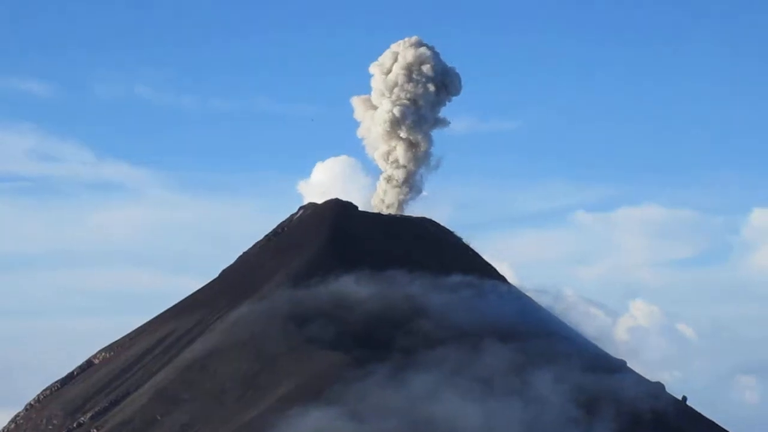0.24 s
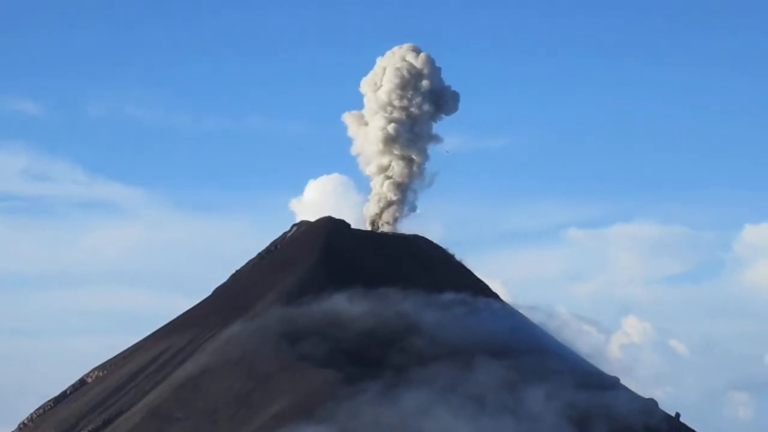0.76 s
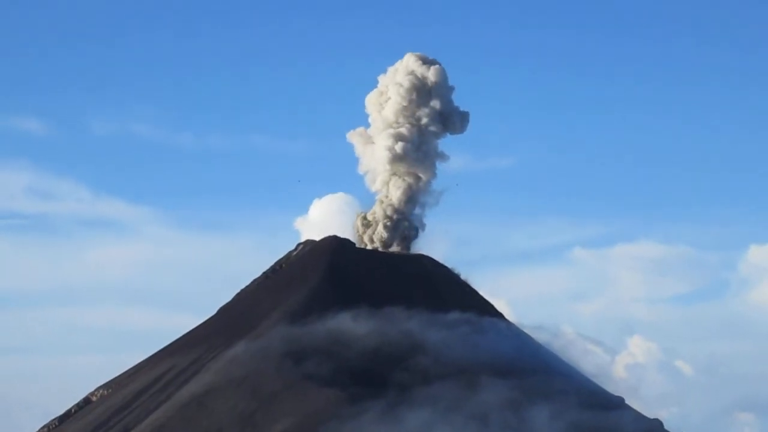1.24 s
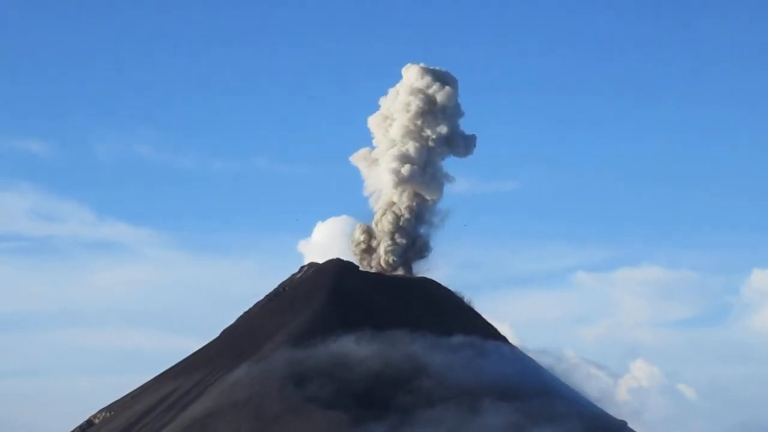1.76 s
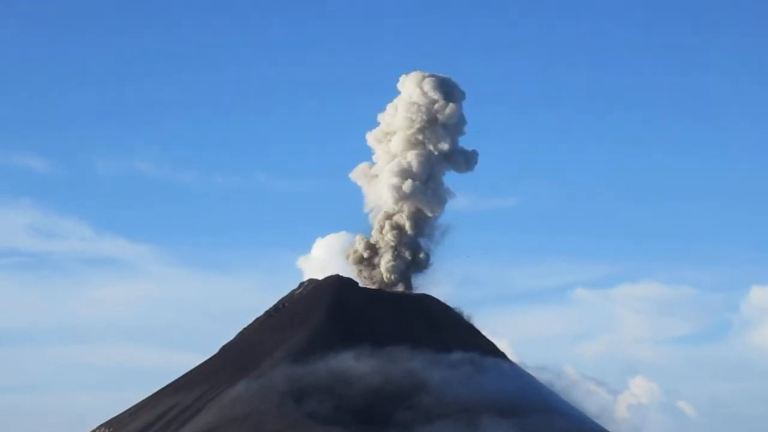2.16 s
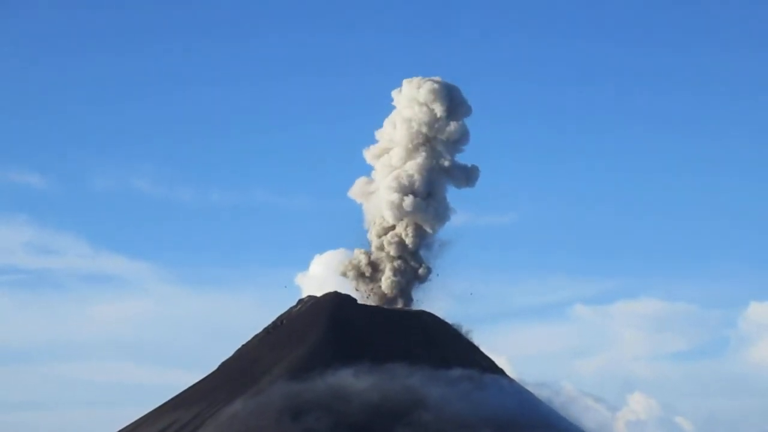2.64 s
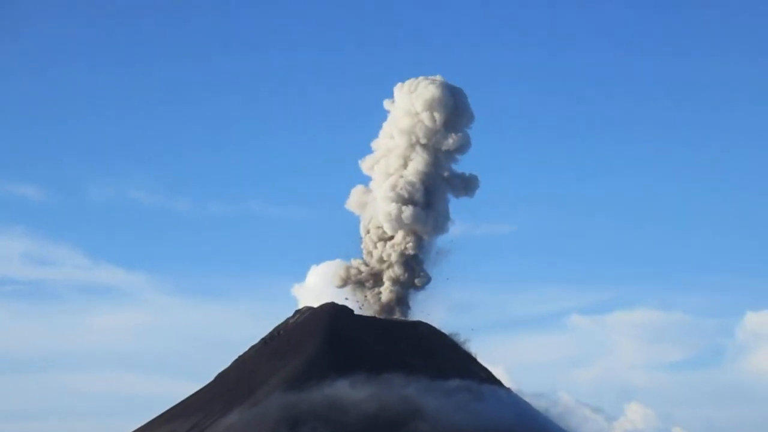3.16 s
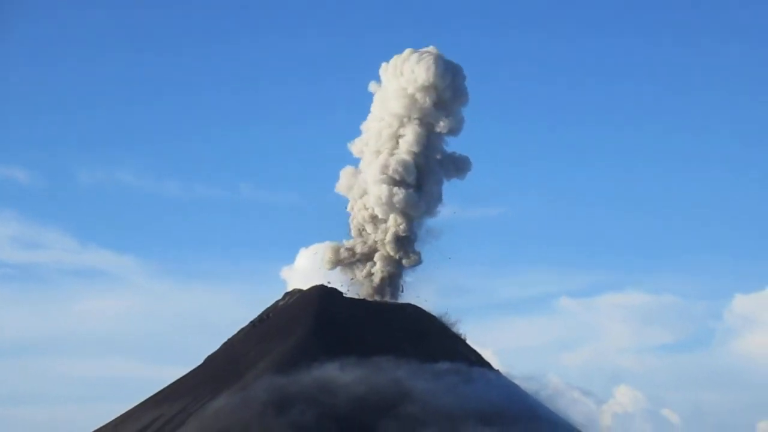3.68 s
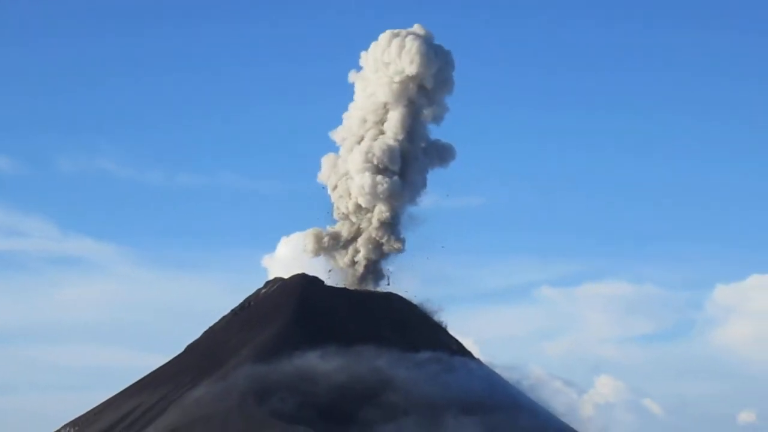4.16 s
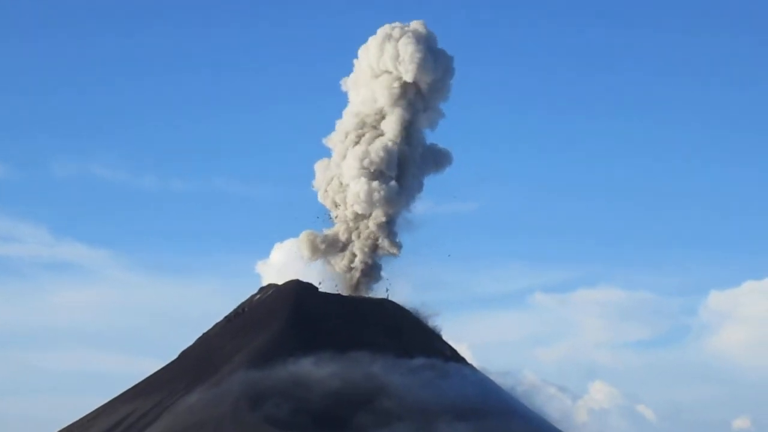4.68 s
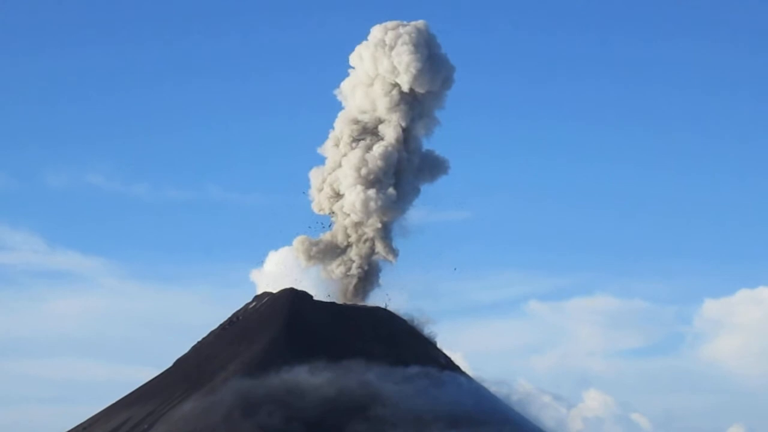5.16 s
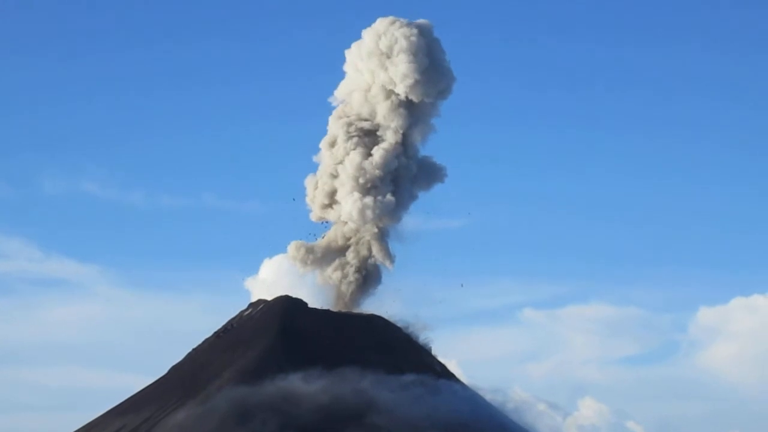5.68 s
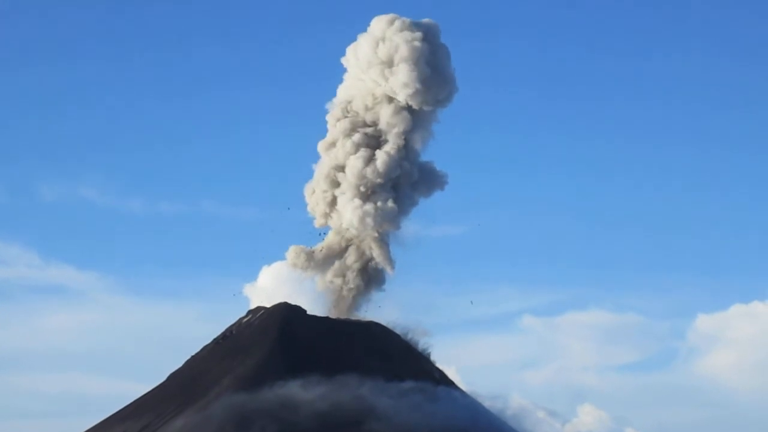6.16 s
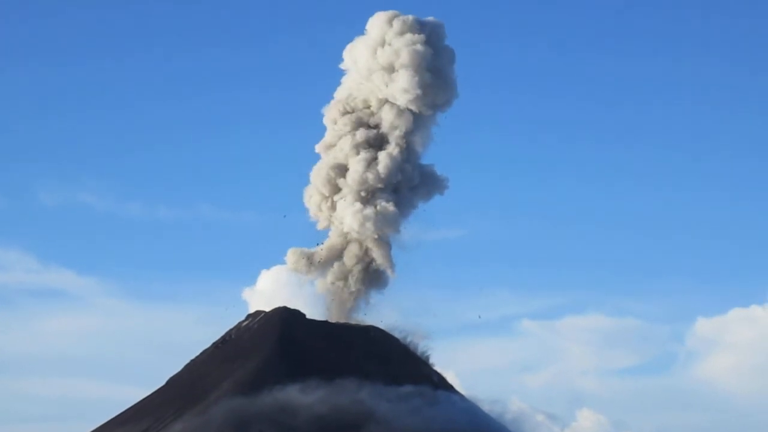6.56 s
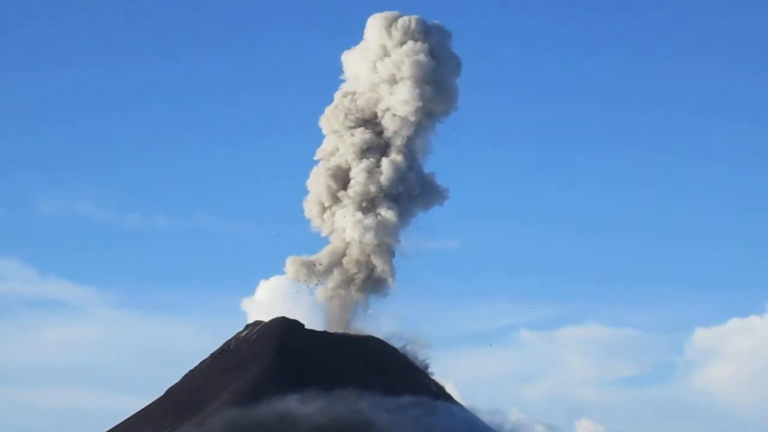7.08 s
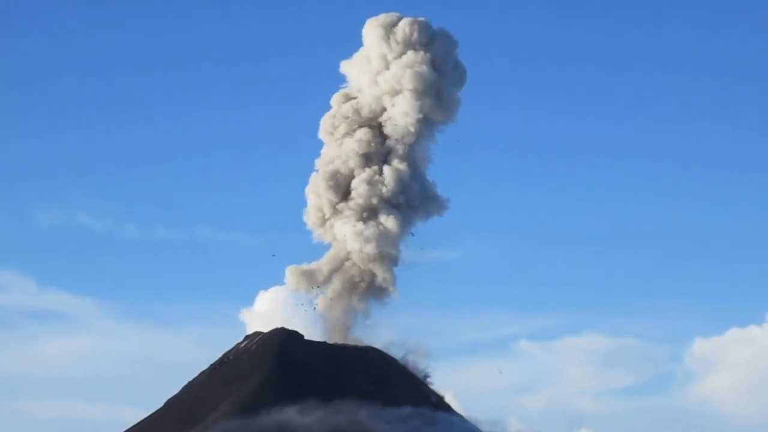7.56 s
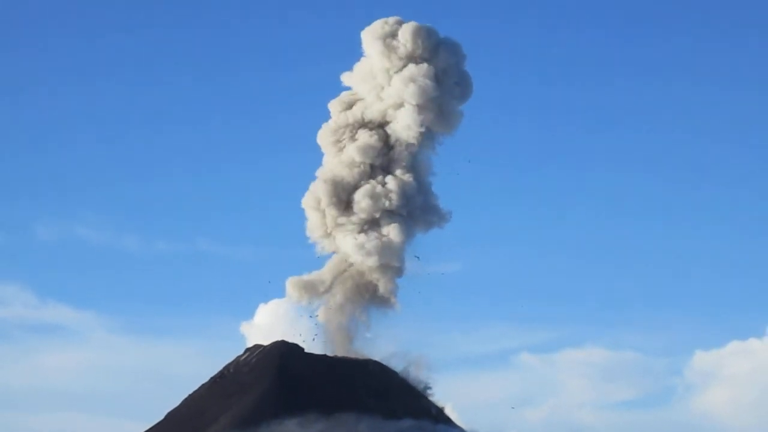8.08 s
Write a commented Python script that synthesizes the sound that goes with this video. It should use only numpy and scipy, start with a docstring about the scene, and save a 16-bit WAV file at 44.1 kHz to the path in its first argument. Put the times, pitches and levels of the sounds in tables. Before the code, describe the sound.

A faint breeze and thin hiss open the scene on an exposed mountain ridge. Suddenly a volcano erupts kilometres away with a deep, muffled boom. Its thunderlike roar rolls on in uneven surges dotted with dull thuds, dips briefly, swells again and weakens near the end. A few faint dry ticks and one sharp click stand apart from the rumble. A single outdoor microphone picks it all up.

```python
"""A volcano erupts, heard through one microphone on a neighbouring ridge, kilometres away.
After a quiet start its jet of gas and ash roars in surges: a crowd of small pressure shocks over
turbulence, with single stronger blasts, all dulled by the long way through the air.
Beneath it lie a light breeze and a faint hiss; a few dry ticks and one sharp click stand out."""
import sys
import numpy as np
from scipy import signal
from scipy.fft import rfft, irfft, next_fast_len
from scipy.io import wavfile
from scipy.ndimage import uniform_filter1d, minimum_filter1d

SR = 44100
rng = np.random.default_rng(int(sys.argv[2]) if len(sys.argv) > 2 else 0)


def file_out(sig):
    """Save sig as 16-bit WAV at sys.argv[1]."""
    # one column per channel
    cols = np.atleast_2d(sig).T
    # limit, then scale
    lim = np.clip(cols, -1, 1)
    pcm = np.round(lim * 32767).astype(np.int16)
    wavfile.write(sys.argv[1], SR, pcm)


N = 367353
TIME = np.arange(N) / SR
ERUPTION_S = 1.54   # the first front reaches the ridge
USUAL_ROAR_DB, CRACKLE_DB = -20, -17   # reference level of the boom; crackle against the boom

# the roar after kilometres of air: (frequency [Hz], relative level [dB])
FAR_SPECTRUM = [(15, -8.5), (40, 0), (100, -2.5), (250, -0.5), (500, -3.5), (800, -16), (1200, -19.5),
                (1700, -37.5), (2200, -48.5), (3000, -70.5), (5000, -105)]
# peaks and notches of the path and the microphone: (centre [Hz], width [Hz], gain [dB])
PATH_PEAKS = [(80, 5, -3.5), (138.1, 23, 8.5), (158.5, 24, -12), (183.4, 16, 4), (219.3, 28, 8),
              (256, 32, 4.5), (351, 27, -13.5), (403.4, 36, 5.5), (480.7, 28, 4.5), (698.4, 100, 6),
              (939, 60, 5.5), (1462, 62, -5.5), (1563, 180, 5.5)]


def from_db(db):
    """Decibels to gain."""
    return 10 ** (np.asarray(db) / 20)


def in_time(rows):
    """Each column of a timed curve at every sample."""
    times, *columns = np.transpose(rows)
    return [np.interp(TIME, times, column) for column in columns]


def rms_one(x):
    """Scale to rms 1."""
    return x / np.sqrt(np.mean(x ** 2) + 1e-20)


def evened(x, span_s):
    """Rms 1 over every stretch of about span_s; faster detail stays."""
    size = int(span_s * SR)
    power = uniform_filter1d(uniform_filter1d(x * x, size), size)
    return x / np.sqrt(np.abs(power) + 1e-20)


def cut(x, hz, kind, order=2):
    """Butterworth low- or high-pass."""
    return signal.sosfilt(signal.butter(order, hz, kind, fs=SR, output="sos"), x)


def band(x, low_hz, high_hz):
    """The part of x between two steep, complementary crossovers."""
    spectrum = rfft(x, 2 * next_fast_len(N))
    hz = np.linspace(0, SR / 2, len(spectrum))
    gain = 1 / (1 + (hz / high_hz) ** 8) - 1 / (1 + (hz / low_hz) ** 8)
    return irfft(spectrum * gain)[:N]


def coloured(x, spectrum, peaks=()):
    """Pass x through a minimum-phase filter: a smooth spectrum with peaks and notches on it."""
    size = 32768
    hz = np.maximum(np.fft.rfftfreq(size, 1 / SR), 1)
    points_hz, points_db = np.transpose(spectrum)
    db = np.interp(np.log(hz), np.log(points_hz), points_db)
    for centre, width, height in peaks:
        db += height / (1 + (2 * (hz - centre) / width) ** 2)
    cepstrum = irfft(np.log(from_db(db)))[:size // 2]
    cepstrum[1:] *= 2
    response = irfft(np.exp(rfft(cepstrum, size)))[:size // 2]
    return signal.fftconvolve(x, response)[:N]


def breeze_and_hiss():
    """Light breeze on the ridge with a thin hiss above it; both sink under the roar."""
    # colour of the breeze: (frequency [Hz], relative level [dB])
    breeze_spectrum = [(12, -22), (22, -13.5), (35, -3.5), (68, -3.5), (105, -13), (160, -8.5),
                       (330, -19.5), (830, -20), (1300, -22), (1750, -20), (2100, -32), (3000, -39.5),
                       (5000, -59.5)]
    # hollow resonances that colour the background noise: (centre [Hz], width [Hz], gain [dB])
    hollow_peaks = [(218, 45, 3.3), (696, 80, 7.3), (1013, 240, 14), (1520, 230, 7.7)]
    # colour of the hiss: (frequency [Hz], relative level [dB])
    hiss_spectrum = [(1290, -30), (2200, -2), (2470, -2.5), (6810, -6), (7770, -8.5), (9090, -7.5),
                     (13200, -13.5), (15800, -19)]
    # course of the hiss: (time [s], level [dB])
    hiss_levels = [(0, -61.5), (1.8, -61), (2.25, -64), (2.85, -61.5), (3.35, -64.5), (3.6, -69),
                   (4.1, -72.5), (5.1, -70.5), (5.7, -74), (7.6, -75.5), (8.3, -73)]
    hiss_db, = in_time(hiss_levels)
    breeze = rms_one(coloured(rng.standard_normal(N), breeze_spectrum, hollow_peaks))
    gusts = np.interp(TIME, np.linspace(0, TIME[-1], 80), rng.standard_normal(80))
    hiss = rms_one(coloured(rng.standard_normal(N), hiss_spectrum))
    freshen_db = 1.5 * np.minimum(TIME - ERUPTION_S, 0)   # rises until the eruption
    sink_db = hiss_db - hiss_db[0]
    breeze_db = -46.5 + 0.3 * gusts + freshen_db + sink_db
    return breeze * from_db(breeze_db) + hiss * from_db(hiss_db + 0.5 * gusts)


def ticks():
    """Short dry ticks, each coloured by a brief ring; two fall on loud peaks of the roar."""
    # (time [s], level [dB], lower edge [Hz], upper edge [Hz], decay [s], ring against burst [dB])
    bursts = [(1.059, -46, 3000, 8000, .004, -14), (1.239, -45, 2500, 7000, .004, 1),
              (1.7565, -46.5, 7000, 14000, 0.0022, -19), (2.8531, -46, 6000, 10000, .002, -16),
              (2.887, -39.5, 1600, 7000, 0.0016, 3), (3.0113, -36.5, 5500, 11000, 0.0015, 1),
              (3.889, -38.5, 1400, 3000, .0015, -15), (5.32, -33.5, 1700, 4970, 0.00095, -13),
              (8.2018, -35.5, 4600, 8500, 0.00073, -30)]
    size, ring_hz, ring_s = 2048, 2600, 0.0015
    out, age = np.zeros(N + size), np.arange(size) / SR
    ring = np.sin(2 * np.pi * ring_hz * age) * np.exp(-age / ring_s)
    for at_s, db, low_hz, high_hz, decay_s, ring_db in bursts:
        burst = rng.standard_normal(size) * np.exp(-age / decay_s)
        burst = cut(cut(burst, low_hz, "high", order=4), high_hz, "low", order=3)
        tick = burst / np.abs(burst).max() + from_db(ring_db) * ring
        out[round(at_s * SR):][:size] += from_db(db) * tick
    return out[:N]


def swell(crest_s, length_s, rise_share=0.44):
    """A bell curve of height 1 that rises a little faster than it falls."""
    age = TIME - crest_s
    width_s = length_s * np.where(age < 0, rise_share, 1 - rise_share)
    return np.exp(-np.minimum((age / width_s) ** 2, 20))


def jet_gains():
    """Gains of rumble, boom, midrange and crackle: the sustained jet and its swells add in power."""
    # the sustained jet: (time [s], level [dB], brightness [dB])
    sustained = [(1.55, -21.5, -0.5), (1.72, -24.5, -4), (2.05, -26.5, 2), (2.39, -27, -3.5),
                 (2.62, -37, .5), (2.76, -22.5, -3.5), (3.32, -22.5, 0.5), (3.52, -14, -2),
                 (4.16, -19.5, 2), (4.35, -23.5, -1), (5.1, -20, -3.5), (5.62, -16, -0.5), (5.77, -24, 0),
                 (6.71, -20, 3), (6.86, -27.5, -1.5), (7.22, -14.5, 0.5), (7.57, -28.5, 2.5),
                 (8.33, -43, 2)]
    # gouts of gas that swell and die: (crest time [s], length [s], level [dB], brightness [dB])
    surges = [(1.653, 0.045, -14, -9), (1.708, .1, -22, 6), (1.826, .13, -14.5, -2),
              (1.978, 0.2, -15.5, -4), (2.101, .068, -13, -10), (2.245, .1, -18.5, -9.5),
              (2.928, .046, -10.5, -3.5), (3.097, 0.075, -16, -.5), (3.205, .1, -22.5, -1),
              (3.405, .15, -18.5, 3.5), (3.732, .07, -19.5, -0.5), (3.878, 0.066, -10, -5.5),
              (4.09, 0.093, -12, -8), (4.22, .04, -13.5, -6), (4.541, .068, -18, -1), (4.855, .23, -16, -2),
              (4.973, .04, -19.5, -3.5), (5.204, 0.063, -17, -1), (5.32, 0.15, -18.5, 1),
              (5.595, .13, -25.5, 10), (5.939, 0.19, -20, -8), (6.101, 0.042, -19.5, 4.5),
              (6.189, .1, -18, -1), (6.423, 0.34, -17.5, -3), (7.119, .1, -17.5, -1.5),
              (7.256, 0.065, -22, 3), (7.346, 0.055, -20, 3.5), (7.742, .16, -22.5, -1),
              (7.95, .13, -26, -3)]
    # brief swells of the low rumble: (crest time [s], level [dB])
    rumble_swells = [(1.56, -26), (1.75, -22), (1.97, -20.5), (2.40, -25.5), (2.72, -25), (2.90, -19),
                     (3.17, -24), (3.42, -22), (3.76, -22.5), (4.12, -22.5), (4.489, -25.5), (4.78, -22.5),
                     (5.55, -19.5), (6.34, -27.5), (7.20, -25), (7.83, -29.5)]
    roar_db, bright_db = in_time(sustained)
    flows = [(from_db(roar_db), bright_db)]
    flows += [(from_db(db) * swell(at_s, length_s), bright) for at_s, length_s, db, bright in surges]
    boom = sum(gain ** 2 for gain, _ in flows)
    middle = sum((gain * from_db(-3.5 + 0.99 * bright)) ** 2 for gain, bright in flows)
    crackle = sum((gain * from_db(CRACKLE_DB + bright)) ** 2 for gain, bright in flows)
    # the rumble follows about half of the roar's swing and slowly sinks
    rumble_db = -26 + 0.48 * (roar_db - USUAL_ROAR_DB) - 0.68 * (TIME - ERUPTION_S)
    swelling = sum((from_db(db) * swell(at_s, length_s=0.16)) ** 2 for at_s, db in rumble_swells)
    return np.sqrt([from_db(rumble_db) ** 2 + swelling, boom, middle, crackle])


def shocks(per_s, spread_db):
    """Compressions arrive at random, most of them weak and a few strong."""
    arrivals = rng.random(N) < per_s / SR
    sizes = arrivals * from_db(spread_db * np.minimum(rng.exponential(1, N), 4))
    return rms_one(sizes - sizes.mean())


def jet():
    """Distant shocks and turbulence, from a deep rumble up to the crackle of the steepest fronts."""
    rumble_gain, boom_gain, middle_gain, crackle_gain = jet_gains()
    age = TIME - ERUPTION_S
    # scattering on the way keeps the shocks distinct only in the lows and smears their top into noise
    fronts = cut(shocks(per_s=600, spread_db=3.0), 750, "low")
    smear = from_db(-0.5) * cut(rng.standard_normal(N), 750, "high")
    turbulence = from_db(-5.0) * rng.standard_normal(N)
    far = coloured(fronts + smear + turbulence, FAR_SPECTRUM, PATH_PEAKS)
    rumble = evened(band(far, 2, 110), span_s=0.12) * rumble_gain
    boom = evened(band(far, 110, 345), span_s=0.045) * boom_gain
    middle = evened(band(far, 345, 800), span_s=0.055) * middle_gain
    crackle = evened(band(far, 800, 8000), span_s=0.05) * crackle_gain
    # stronger surges have steeper fronts and so a brighter top edge, more so as the jet builds
    edge = cut(rng.standard_normal(N), 1750, "high", order=7)
    edge = rms_one(cut(edge, 2000, "low", order=8))
    steepness = (crackle_gain / from_db(USUAL_ROAR_DB + CRACKLE_DB)) ** 2
    edge *= steepness * from_db(-71.0 + 1.02 * age)
    # turbulent air makes the level flutter
    flutter_db = 0.83 * rms_one(cut(rng.standard_normal(N), 18, "low"))
    roar = (boom + middle + crackle + edge) * from_db(flutter_db)
    rise_s, bass_lead_s = 0.022, 0.017   # the first front is rounded: its bass arrives first
    return rumble * np.clip((age + bass_lead_s) / rise_s, 0, 1) + roar * np.clip(age / rise_s, 0, 1)


def blasts():
    """Each blast is one strong, rounded compression that takes the roar's path to the ridge."""
    # single blasts at the microphone: (time [s], relative level [dB])
    arrivals = [(1.573, -13), (1.647, -2), (1.807, -5), (2.101, -4), (2.923, -6), (3.424, -3), (3.767, -5),
                (3.89, -9), (4.064, -2.5), (4.54, -8), (4.831, -9), (4.973, -3.5), (5.319, -3.5),
                (5.646, -1.5), (5.97, -3), (6.441, -5), (7.203, -4.5), (7.266, -4.5)]
    kicks = np.zeros(N)
    for at_s, db in arrivals:
        kicks[round(at_s * SR)] = from_db(db)
    far = coloured(kicks, FAR_SPECTRUM, PATH_PEAKS)
    path_peak = np.abs(coloured(signal.unit_impulse(N), FAR_SPECTRUM, PATH_PEAKS)).max()
    return from_db(-4.0) * cut(far, 740, "low") / path_peak


def click(at_s=6.4913, peak_db=-9, decay_s=0.00073):
    """One sharp click: a sudden step in the signal that dies away at once."""
    out, age = np.zeros(N), np.arange(2048) / SR
    out[round(at_s * SR):][:len(age)] = from_db(peak_db) * np.exp(-age / decay_s)
    return out


def limited(x, ceiling, span_s):
    """The gain ducks smoothly around any peak that would pass the ceiling."""
    size = int(span_s * SR)
    gain = minimum_filter1d(ceiling / np.maximum(np.abs(x), ceiling), 2 * size + 1)
    return x * uniform_filter1d(uniform_filter1d(gain, size), size)


def scene():
    """The far eruption with the breeze, hiss, ticks and click, in mono."""
    return (jet() + blasts() + breeze_and_hiss() + ticks() + click())[None]


def record(dry):
    """Sound begins after a brief silence; a limiter holds the peaks and the top is cut."""
    start_s, fade_s, cutoff_hz = 0.242, 0.004, 16750
    opened = dry * np.clip((TIME - start_s) / fade_s, 0, 1)
    held = limited(opened, ceiling=1, span_s=0.003)
    return signal.sosfilt(signal.cheby2(16, 70, cutoff_hz, fs=SR, output="sos"), held)


dry = scene()
out = record(dry)
file_out(out)
```